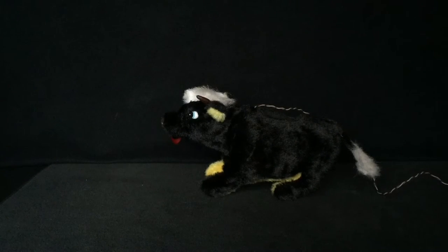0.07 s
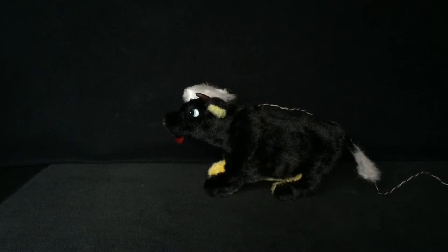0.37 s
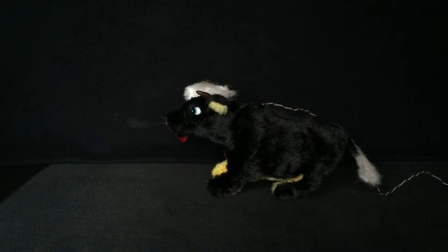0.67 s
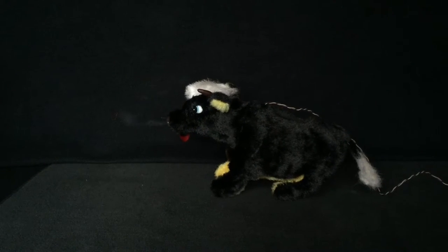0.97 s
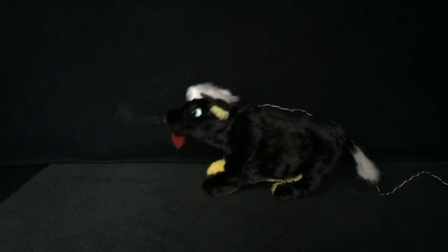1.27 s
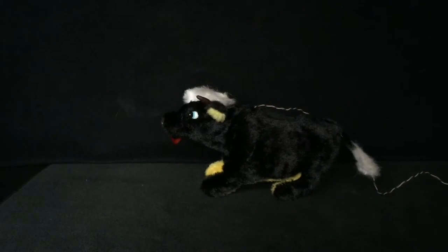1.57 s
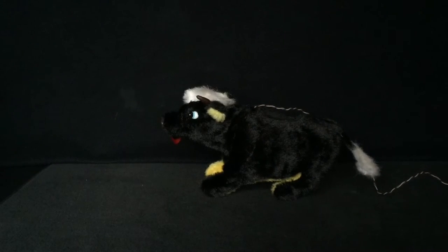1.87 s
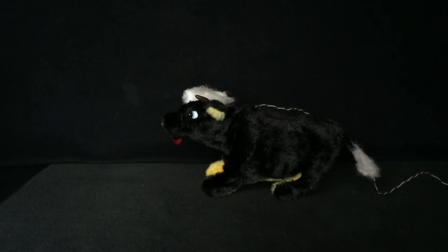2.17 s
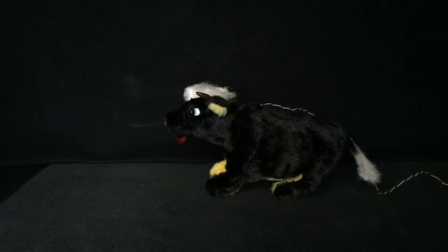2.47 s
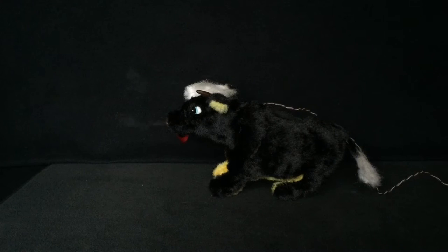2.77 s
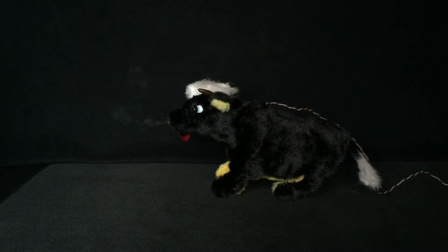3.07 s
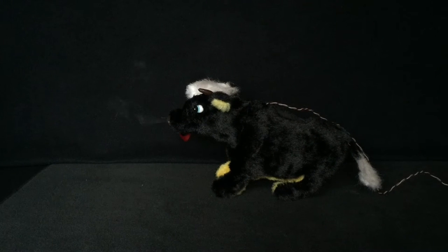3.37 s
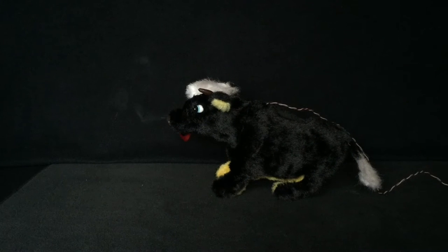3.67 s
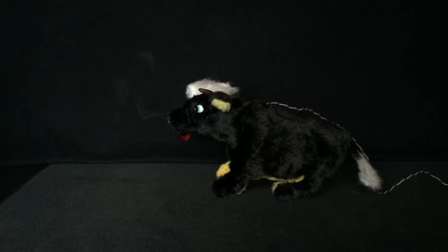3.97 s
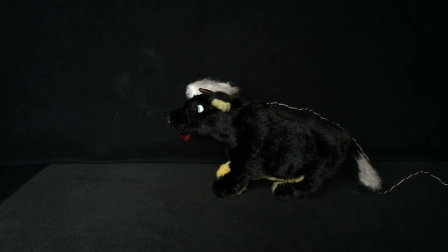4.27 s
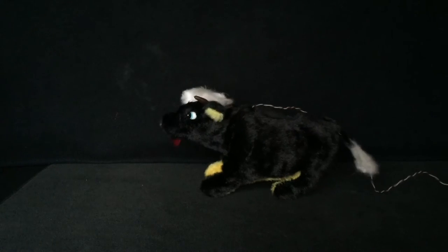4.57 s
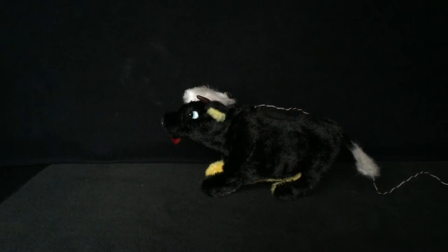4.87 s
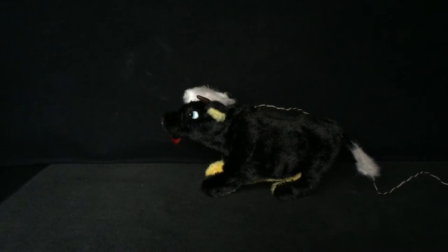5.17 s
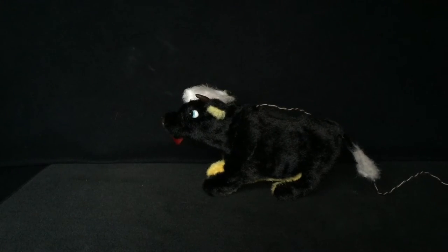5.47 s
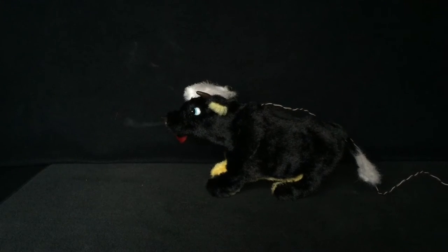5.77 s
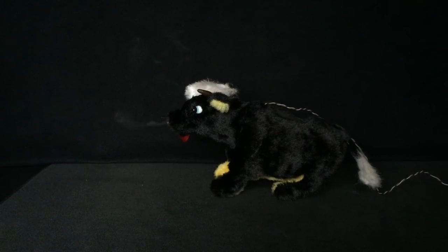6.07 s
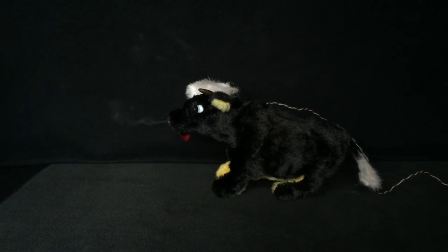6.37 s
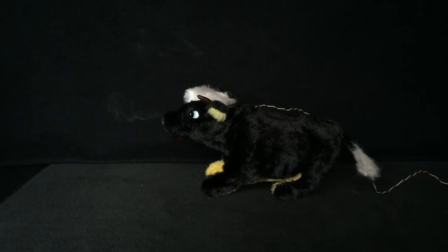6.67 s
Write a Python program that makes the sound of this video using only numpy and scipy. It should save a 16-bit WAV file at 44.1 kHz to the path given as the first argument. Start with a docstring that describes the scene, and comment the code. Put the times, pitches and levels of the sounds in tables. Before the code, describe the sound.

A battery toy animal whirrs steadily, with bursts of rapid ratchet clicks and a plastic clack ending each pause.

```python
"""Plush battery toy, close up

A toy animal works through its cycle close to the microphone, in a small dead room. Its motor and
loose gear train whirr throughout, ringing the gearbox and shell. In four bursts a pawl slips over
a ratchet about 17 times a second. In each pause a cam rubs and squeaks under load as it lifts the
body, until a lever drops with a clack and the next burst begins."""
import sys
import numpy as np
from scipy import signal
from scipy.fft import rfft, irfft
from scipy.io import wavfile
from scipy.ndimage import uniform_filter1d

SR = 44100
rng = np.random.default_rng(int(sys.argv[2]) if len(sys.argv) > 2 else 0)


def unload_wav(signal):
    """Save mono or channel-first audio to the path in sys.argv[1] as 16-bit WAV at rate SR, clipped to [-1, 1]."""
    wavfile.write(
        sys.argv[1],
        SR,
        np.round(np.clip(np.atleast_2d(signal).T, -1, 1) * 32767).astype(np.int16),
    )


N = 305613
TIME = np.arange(N) / SR
LOAD_ATTACK_S, LOAD_RELEASE_S = 0.057, 0.031


# ring of the pawl and its wheel: (frequency [Hz], level [dB], t60 [s])
PAWL_RING = [(837, -21, 0.0072), (1073, -20.5, 0.0043), (1670, -24, 0.017), (2136, -39.5, 0.032),
             (2350, -30.5, 0.018), (2910, -33, 0.023), (3530, -23, 0.0066), (4695, -20, 0.0093),
             (5010, -19.5, 0.0032), (5770, -16, 0.013), (6345, -17, 0.03), (6750, -14.5, 0.0082),
             (7600, -24, 0.0067), (7780, -21, 0.0035), (9450, -25, 0.0071), (11010, -27.5, 0.022),
             (12000, -25, 0.0036), (12160, -20.5, 0.012), (14530, -29, 0.0122)]

def ratchet(level_db=-0.37, leave_db=4.5, land_s=0.0003994, rebound_s=0.002585, rebound_db=-8):
    """The pawl leaves one tooth, lands on the next a moment later and rebounds once."""
    out, t = np.zeros(N), TIME[:1500]
    hz, db, t60 = np.transpose(PAWL_RING)[:, :, None]
    swing = (-1) ** np.arange(1, len(hz) + 1)[:, None]  # neighbouring modes swing opposite ways
    top, middle = hz > 7500, (hz > 4000) & (hz < 5000)
    for s, click_db in wheel_teeth():
        # each tooth meets the pawl at a slightly different spot and favours other modes
        top_db, middle_db = rng.normal([0, -0.14], [1, 0.5])
        scatter_db = rng.standard_normal(hz.shape)
        gains = swing * undb(db + scatter_db + top_db * top + middle_db * middle)
        pitch = 1 + 0.002 * rng.standard_normal()
        for lag, blow_db in [(0, leave_db), (land_s, 0), (rebound_s, rebound_db)]:
            age = np.maximum(t - lag, 0)
            modes = gains * decay(age, t60) * np.sin(2 * np.pi * hz * pitch * age)
            add(out, s, modes.sum(axis=0) * undb(level_db + click_db + blow_db))
        # the tooth edge scrapes even when it only grazes the pawl
        scrape = cut(rng.standard_normal(len(t)), 1800, "high") * decay(t, t60=0.018)
        add(out, s, scrape * undb(-24 + 0.27 * click_db))
    return cut(out, 424, "high")  # parts this small radiate no bass


# travel of the ratchet wheel, one list per burst: (time [s], position [teeth])
WHEEL_TRAVEL = [
    [(0.0202, 12), (0.2429, 16), (0.3576, 18), (0.5441, 21), (0.7171, 24)],
    [(1.3521, 1), (1.4135, 2), (1.7567, 8), (1.9906, 12), (2.094, 14), (2.3789, 19), (2.4895, 21),
     (2.6698, 24)],
    [(4.5734, 1), (4.8046, 5), (4.9679, 8), (5.1427, 11), (5.3688, 15), (5.4178, 16), (5.5951, 19),
     (5.7787, 22), (5.8947, 24)],
    [(6.6275, 1), (6.7384, 3), (6.9017, 6)],
]

def wheel_teeth(last_tooth=24, release_db=-8.5, release_teeth=0.53):
    """Time [s] and level [dB] of each passing tooth; the pawl lifts clear towards the wheel's last."""
    for burst in WHEEL_TRAVEL:
        times, positions = np.transpose(burst)
        for tooth in np.arange(positions[0], positions[-1] + 1):
            click_db = release_db * np.exp((tooth - last_tooth) / release_teeth)
            yield np.interp(tooth, positions, times), click_db


# pings that end the first three bursts: (time [s], frequency [Hz], level [dB])
TIP_PINGS = [(0.715, 3300, -21), (2.669, 7600, -22), (5.892, 3300, -22)]

def pawl_brushes(t60=0.027):
    """The last tooth only brushes the pawl's tip: a short ping with a pitch of its own."""
    out, t = np.zeros(N), TIME[:SR // 20]
    for s, hz, db in TIP_PINGS:
        add(out, s, undb(db) * decay(t, t60) * np.sin(2 * np.pi * hz * t))
    return out


# the cam lifts the body between bursts, until the lever drops:
# (load on [s], drop [s], starting cam rub [dB], clack offset [dB], bass offset [dB])
CAM_LIFTS = [(0.695, 1.306, -36.5, 2, -3.5), (2.66, 4.5305, -36.5, 2.5, -1),
             (5.88, 6.5515, -36.5, 3.5, -4.5)]
# spectrum of the lever's clack: (frequency [Hz], level [dB])
CLACK_SPECTRUM = [(60, -48), (200, -11), (600, -1), (1100, 2), (2000, 3.5), (3000, -1.5), (5500, 1.5),
                  (8500, -0.5), (10500, -9), (13000, -3), (16000, -24)]
# the body knocking on the table: (frequency [Hz], width [Hz], level [dB])
KNOCK_MODES = [(300, 120, -8), (470, 78, 3), (660, 140, 0)]

def lever(slap_db=-17, thud_db=-46, knock_db=-17, t60=0.022, bounce_s=0.0018):
    """The lever slaps the shell, bounces and chatters out; the body knocks and the table thuds softly."""
    out, t = np.zeros(N), TIME[:SR // 2]
    knock = resonate(1. * (t == 0), KNOCK_MODES)
    knock = cut(knock, 180, "high") / np.abs(knock).max()
    bounce = (t > bounce_s) * undb(-2) * decay(np.abs(t - bounce_s), t60)
    chatter = undb(-7) * decay(t, t60=0.032)
    force = np.sqrt(decay(t, t60) ** 2 + bounce ** 2 + chatter ** 2)
    for _, drop, _, clack_db, bass_db in CAM_LIFTS:
        slap = unit(colour(rng.standard_normal(len(t)), CLACK_SPECTRUM)) * force
        bass = cut(cut(rng.standard_normal(len(t)), 130, "low"), 35, "high")
        thud = unit(bass) * decay(t, t60=0.15)
        add(out, drop, slap * undb(slap_db + clack_db))
        add(out, drop, thud * undb(thud_db + bass_db))
        add(out, drop, knock * undb(knock_db + 2 * bass_db))
    return out


# gear rattle at the microphone: (time [s], level [dB])
RATTLE_LEVEL = [(0, -28.5), (.18, -31), (.3, -32.5), (.75, -32.5), (1.17, -36), (1.31, -28.5),
                (1.45, -30.5), (2.12, -29), (2.3, -35), (2.5, -30.5), (2.95, -36.5), (3.2, -34),
                (3.45, -33), (5.3, -30), (5.85, -33), (6.35, -37), (6.6, -28.5), (6.93, -32.5)]
# resonances of gearbox, cam and lower, middle and upper shell: (frequency [Hz], width [Hz], level [dB])
GEARBOX_MODES = [(868, 69, -20), (1024, 147, 10.5), (1193, 244, 3)]
CAM_RUB_MODES = [(604.4, 102, 2.5), (695, 277, -3.5)]
LOWER_SHELL = [(352.7, 148, -0.99), (408, 181, -1)]
MIDDLE_SHELL = [(1433, 246, -0.081), (1647, 130, -1.1), (1742, 92, -2)]
UPPER_SHELL = [(1985, 246, 2.5), (2520, 80, 1), (2646, 234, -2.5), (3807, 400, -5.5), (4660, 246, -5.5)]
# hiss of the sliding teeth: (frequency [Hz], level [dB])
HISS_SPECTRUM = [(1800, -31), (3200, -6), (4300, -7.5), (4950, 3), (5250, 5), (5800, 2), (6550, 5.5),
                 (7100, 2), (7600, -2), (9700, 0.5), (10500, -5), (11400, 4), (12500, 4), (15700, -2)]

def gear_whirr(buzz_db=-35.5, hiss_db=-33.5):
    """Loose teeth knock and slide, ringing gearbox, cam and shell; backlash makes them come in flurries."""
    cam_gain, boom_gain, whine_gain = undb(strain())
    gear_gain = undb(np.interp(TIME, *np.transpose(RATTLE_LEVEL)))
    backlash = walk(160)
    load = cam_gain / cam_gain.max()  # the harder the cam bears, the more the gears chatter
    chatter = shaft_flurries(rate_hz=64, wander=0.1624, sharpness=0.5 * load)
    surge = walk(30)  # the drive binds and frees itself many times a second
    knocks = impacts(rate=2400, spread_db=1.4) * chatter
    knocks *= undb(1.56 * backlash + 1.02 * surge + 0.5 * walk(13))
    scrape = impacts(rate=9000, spread_db=3.5) * undb(1.5 * backlash + 0.16 * walk(24.83))
    low_knocks = impacts(rate=1400, spread_db=1.5)
    grit = unit(knocks) + 1.5 * unit(scrape)  # the shell feels both the knocks and the sliding teeth
    gears = unit(cut(resonate(knocks, GEARBOX_MODES), 630, "high")) * gear_gain
    cam = unit(cut(resonate(knocks, CAM_RUB_MODES), 428, "high", order=6)) * cam_gain
    boom = unit(cut(resonate(low_knocks, LOWER_SHELL), 249, "high", order=6)) * boom_gain
    middle = cut(resonate(grit, MIDDLE_SHELL), 940, "high", order=4)
    upper = cut(resonate(grit, UPPER_SHELL), 1970, "high", order=4)
    buzz = hollow_body(middle, ring_db=-11.5, t60=0.16) * undb(buzz_db)
    whine = hollow_body(upper, ring_db=-13.5, t60=0.35) * whine_gain
    hiss = hollow_body(colour(scrape, HISS_SPECTRUM), ring_db=-22, t60=0.17) * undb(hiss_db)
    return gears + cam + boom + buzz + whine + hiss


def shaft_flurries(rate_hz, wander, sharpness):
    """Knocks swell once in each turn of an unsteady shaft: a gain of rms 1."""
    turns = np.cumsum(rate_hz * (1 + wander * walk(35))) / SR
    return unit(np.exp(sharpness * np.cos(2 * np.pi * turns)))


def hollow_body(x, ring_db, t60):
    """The hollow body adds a dense, short ring; the result has rms 1."""
    t = TIME[:SR // 4]
    ring = rng.standard_normal(len(t)) * decay(t, t60) * (t > 0.004)
    return unit(x + undb(ring_db) * signal.fftconvolve(x, ring / np.linalg.norm(ring))[:N])


def strain(cam_idle_db=-41, rise_db_per_s=2.2, sag_db_per_s=1.3):
    """Levels [dB] of cam rub, shell boom and whine: as the body rises, the rub grows and the boom thins."""
    cam_db, boom_db, whine_db = cam_idle_db, -43, -36.5
    for on, drop, rub_db, _, _ in CAM_LIFTS:
        load, age = cam_load(on, drop, LOAD_ATTACK_S), TIME - on
        swell_db = 4.5 * np.exp(-((age - 0.24) / 0.12) ** 2)  # the shell booms as it takes up the load
        cam_db += load * (rub_db + rise_db_per_s * age - cam_idle_db)
        boom_db += swell_db - sag_db_per_s * age * load
        whine_db += 0.7 * load
    return cam_db, boom_db, whine_db


def cam_load(on, drop, attack_s):
    """Load of one lift, 0-1: it builds up and is let go when the lever drops."""
    return np.clip((TIME - on) / attack_s, 0, 1) * np.clip(1 - (TIME - drop) / LOAD_RELEASE_S, 0, 1)


# the cam's thin squeak: (frequency [Hz], width [Hz], level [dB])
PLASTIC_MODES = [(7090, 90, -12), (8000, 150, -23)]

def cam_squeak(squeak_db=-43.5, creep_s=0.75, sing_db=-46, sing_hz=2116, sing_width_hz=80):
    """Dry plastic sticks and slips on the loaded cam, and the strained drive sings in one narrow band."""
    creep = sum(cam_load(on, drop, creep_s) for on, drop, *_ in CAM_LIFTS)
    load = sum(cam_load(on, drop, LOAD_ATTACK_S) for on, drop, *_ in CAM_LIFTS)
    slips = impacts(rate=4000, spread_db=3.5) * undb(2 * walk(14))
    squeak = unit(cut(resonate(slips, PLASTIC_MODES), 4740, "high"))
    sing = unit(resonate(slips, [(sing_hz, sing_width_hz, 0)]))
    return squeak * creep * undb(squeak_db) + sing * load * undb(sing_db)


# nearby surfaces throw the clicks back to the microphone: (delay [s], level [dB])
REFLECTIONS = [(0.015, -15), (0.0273, -11.5), (.0278, -32), (.0293, -29), (.0308, -35)]

def room(x, tail_db=-21, tail_t60=0.29):
    """The small room returns a few dull reflections and a faint, short tail."""
    t = TIME[:SR // 3]
    tail = cut(rng.standard_normal(len(t)), 6300, "low") * decay(t, tail_t60) * (t > 0.005)
    out = x + undb(tail_db) * signal.fftconvolve(x, tail / np.linalg.norm(tail))[:N]
    dull = cut(x, 2250, "low")
    for s, db in REFLECTIONS:
        add(out, s, undb(db) * dull)
    return out


# room tone behind the toy: (frequency [Hz], level [dB])
RUMBLE_SPECTRUM = [(20, -26), (35, -10), (52, 1), (75, -5), (102, 7.5), (125, -3.5), (200, -8), (400, -26),
                   (2000, -58)]

def room_rumble(level_db=-69.5):
    """A faint, steady low noise fills the room."""
    return unit(colour(rng.standard_normal(N), RUMBLE_SPECTRUM)) * undb(level_db)


def impacts(rate, spread_db):
    """Tiny random blows, about rate a second, a few much harder than the rest."""
    hits = (rng.random(N) < rate / SR) * rng.choice([-1, 1], N)
    return hits * undb(spread_db * np.minimum(rng.exponential(size=N), 4))


def walk(rate):
    """Smooth random drift of rms 1, changing about rate times a second."""
    hold = int(SR / rate)
    steps = np.repeat(rng.standard_normal(N)[:N // hold + 1], hold)
    return unit(uniform_filter1d(steps, hold)[:N])


def resonate(x, modes):
    """Parallel resonances; neighbours swing in opposite directions."""
    return sum((-1) ** k * undb(db) * signal.lfilter(*signal.iirpeak(hz, hz / width, fs=SR), x)
               for k, (hz, width, db) in enumerate(modes))


def colour(x, points, size=4096):
    """Minimum-phase filter through (frequency [Hz], level [dB]) points."""
    hz, db = np.transpose(points)
    log_hz = np.log(np.fft.rfftfreq(size, 1 / SR) + 1)
    gain = undb(np.interp(log_hz, np.log(hz), db))
    cepstrum = irfft(np.log(gain))
    cepstrum[1:size // 2] *= 2
    cepstrum[size // 2 + 1:] = 0
    response = irfft(np.exp(rfft(cepstrum)))
    return signal.fftconvolve(x, response)[:len(x)]


def cut(x, hz, kind, order=2):
    """Low-pass or high-pass."""
    return signal.sosfilt(signal.butter(order, hz, kind, fs=SR, output="sos"), x)


def add(out, s, x):
    """Mix x into out at s seconds."""
    i = round(s * SR)
    out[i:i + len(x)] += x[:max(N - i, 0)]


def decay(t, t60):
    """Gain that falls 60 dB in t60 seconds."""
    return undb(-60 * t / t60)


def undb(db):
    """Decibels to gain."""
    return 10 ** (np.asarray(db) / 20)


def unit(x):
    """Scale to rms 1."""
    return x / np.sqrt(np.mean(x ** 2))


def scene():
    """One microphone close to the toy; the room answers its clicks and clacks."""
    rumble = room_rumble()
    drive = gear_whirr() + cam_squeak()
    clicks = room(ratchet() + pawl_brushes() + lever())
    return (drive + clicks + rumble)[None]


def record(dry):
    """The recorder cuts the top steeply above 15.9 kHz."""
    return signal.sosfilt(signal.ellip(10, 0.1, 80, 15900, fs=SR, output="sos"), dry)


dry = scene()
out = record(dry)
unload_wav(out)
```